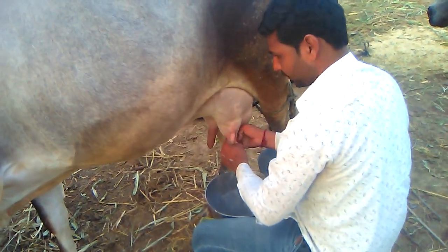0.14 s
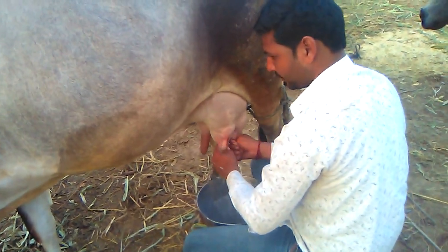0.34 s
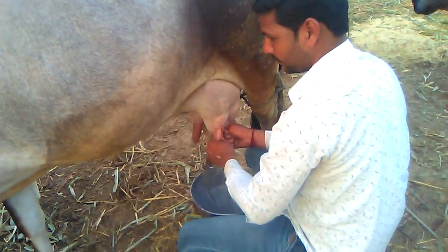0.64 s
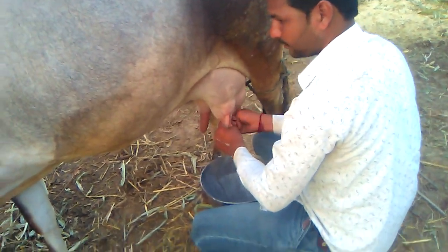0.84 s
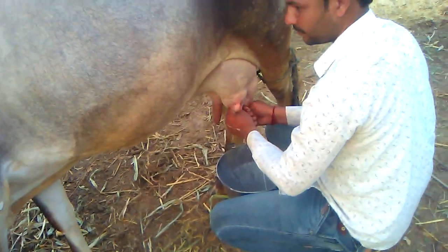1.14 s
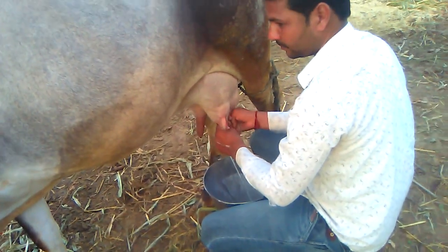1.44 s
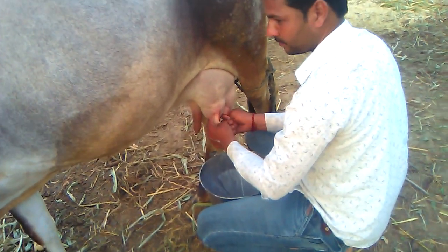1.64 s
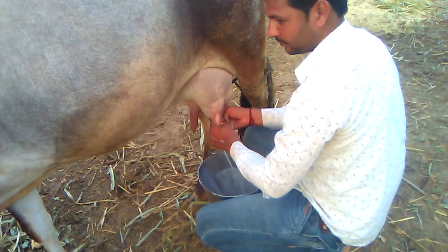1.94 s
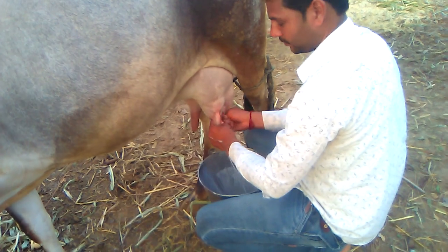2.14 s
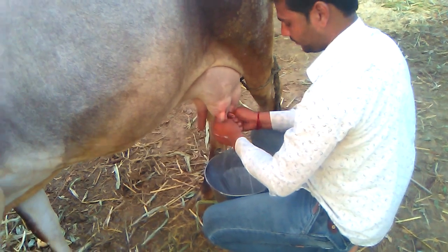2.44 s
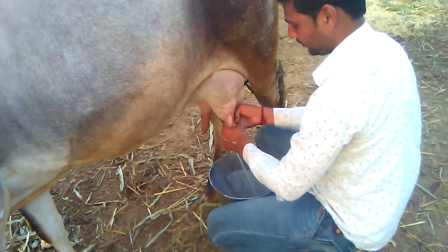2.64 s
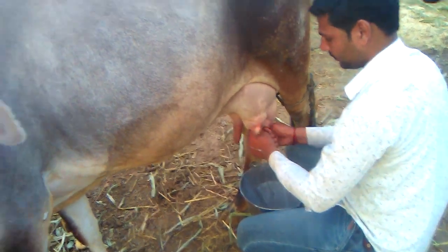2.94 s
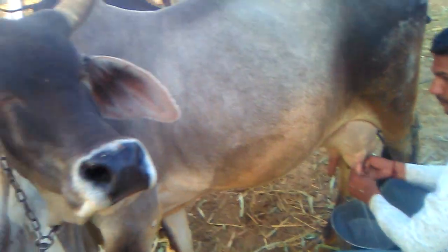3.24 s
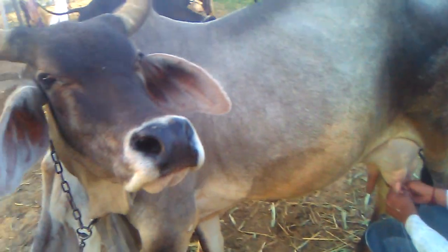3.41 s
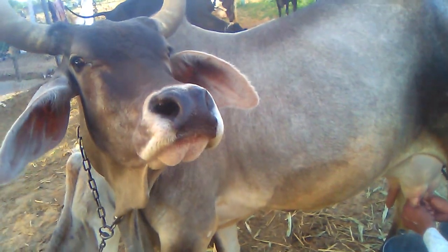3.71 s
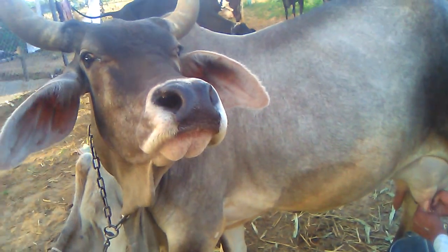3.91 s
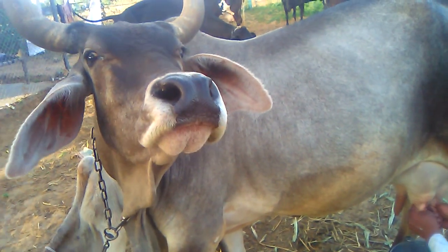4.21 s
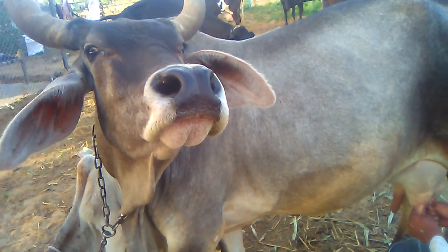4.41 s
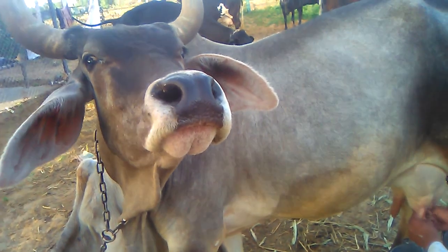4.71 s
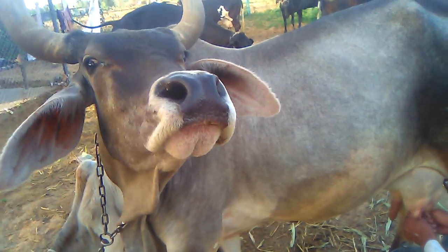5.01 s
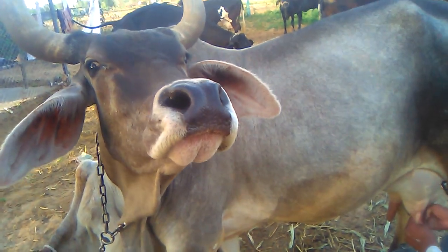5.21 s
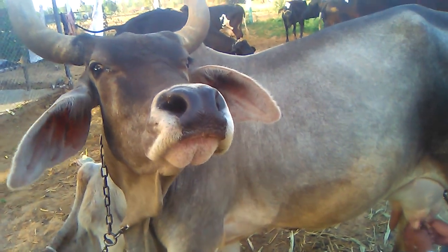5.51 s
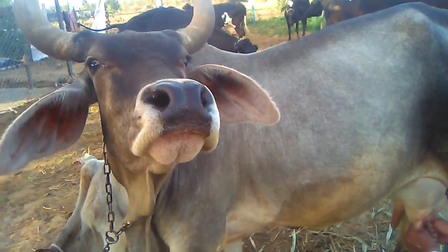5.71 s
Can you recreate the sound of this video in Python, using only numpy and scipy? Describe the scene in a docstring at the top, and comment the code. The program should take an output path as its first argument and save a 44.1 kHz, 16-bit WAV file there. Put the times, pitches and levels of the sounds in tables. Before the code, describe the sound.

A cow is milked by hand outdoors. About three short squirts a second land in a frothy steel pail, some fizzy and skimming, some plunging with a hollow gurgle. Dull taps and scuffs come early; straw rustles with each pull over a faint throbbing engine. Bird slurs and falling whistles come later, fingers rub the camera, then a sharp knock and a weak last jet. Close handheld camera microphone.

```python
"""A cow is milked by hand in an open yard: two hands in turn shoot jets into the froth in a steel pail.
From the start each jet whips up a swarm of small bubbles, deeper ones as it digs in, and fine spray.
Straw rustles and a far engine throbs throughout; early on there are dull taps and low noisy scuffs.
A bird gives a few short slurs, then, in the last third, three falling whistles; fingers rub the camera.
Near the end something knocks sharply against the camera, and one last weak jet follows."""
import sys
import numpy as np
from scipy import signal
from scipy.fft import rfft, irfft, next_fast_len
from scipy.io import wavfile
from scipy.ndimage import uniform_filter1d, map_coordinates

SR = 44100
rng = np.random.default_rng(int(sys.argv[2]) if len(sys.argv) > 2 else 0)


def wav_out(sig):
    """Save sig, one row per channel (or a flat mono array), as 16-bit PCM at SR to the path in sys.argv[1]."""
    wavfile.write(sys.argv[1], SR, np.round(np.clip(np.atleast_2d(sig).T, -1, 1) * 32767).astype(np.int16))


N = 258426  # length in samples

# Far engine. Each row: time in seconds, firing rate in Hz, level in dB before a small overall cut.
ENGINE_COURSE = [(0.0, 67.7, -73), (0.19, 65.4, -56), (2.2, 73.3, -44.5), (2.39, 66.4, -72),
                 (2.6, 72.7, -43.5), (4.4, 77.7, -48.5), (4.7, 74.4, -42.5), (4.8, 65.1, -50),
                 (4.96, 64.7, -46), (5.1, 75.8, -47.5), (5.44, 75.3, -48), (5.6, 63.5, -58)]
# Low rumble of the yard. Each row: frequency in Hz, relative level in dB.
RUMBLE_COLOUR = [(20, -38), (36, -3), (46, -33), (62, 12), (85, -3.5), (108, -1.5), (130, -9.5), (200, -21),
                 (400, -22.5), (800, -63)]
# Faint air of the yard. Each row: frequency in Hz, relative level in dB.
AIR_COLOUR = [(100, 6), (300, -1.5), (700, 5.5), (1600, 8), (2600, 0.5), (4500, -1.5), (14000, -49)]
THROB_HZ, THROB_DEPTH = 9.3, 0.54  # the engine's slow beat: mean rate, depth as a share

# The bird's falling whistle. Each row: seconds from its start, pitch in Hz, level in dB re the whistle.
WHISTLE_SHAPE = [(-.015, 7390, -28), (0, 6950, -9), (.04, 6160, 5), (.08, 5090, -1), (.12, 4200, -1.5),
                 (.16, 3330, -3), (.2, 2880, -2), (0.241, 2810, -5), (.265, 2830, -20)]
# When it whistles. Each row: start in seconds, level in dB.
WHISTLE_STARTS = [(4.1, -50.5), (4.802, -49.5), (5.304, -53)]
# Short slurs of the bird. Each row: start in seconds, length in seconds, start Hz, end Hz, level in dB.
BIRD_SLURS = [(0.128, 0.075, 4500, 6220, -57), (3.226, .045, 4520, 3000, -52.5),
              (3.356, 0.016, 3660, 5800, -51.5), (3.527, 0.083, 4640, 2410, -46.5),
              (3.666, 0.019, 3570, 5900, -54.5)]
# Faint wavering tones. Each row: start in seconds, length in seconds, mean pitch in Hz, level in dB.
FAINT_TONES = [(1.333, 1.74, 192, -62.5), (3.197, 0.23, 1570, -58)]

# Straw rustle between and beneath the pulls, rising and falling. Each row: time in seconds, level in dB.
RUSTLE_LEVEL = [(0, -60), (.9, -61), (1.8, -58), (2.7, -60.5), (3.12, -61), (3.4, -71), (3.62, -60),
                (4.03, -65.5), (4.35, -57.5), (4.7, -70), (4.95, -58), (5.86, -65.5)]
# Extra top treble of the rustle. Each row: time in seconds, level in dB re the crackle.
RUSTLE_TOP_LEVEL = [(0, -18), (3.2, -17), (4.1, -8), (5.86, -10)]
# Colour of the straw crackle. Each row: frequency in Hz, relative level in dB.
STRAW_COLOUR = [(2800, -68), (4400, -8.5), (4960, -4.5), (6100, 4.5), (7000, 1.5), (8200, 3), (9700, 1.5),
                (11100, -2), (14300, -7)]
# Colour of that top treble. Each row: frequency in Hz, relative level in dB.
RUSTLE_TOP_COLOUR = [(8000, -43), (12000, 17), (14500, 9), (16000, -30)]
# Straw snaps and stray drops. Each row: time in seconds, strength in dB before a fixed cut.
STRAW_SNAPS = [(0.2608, -62), (0.792, -32.5), (1.781, -36), (1.8266, -33.5), (2.453, -39), (2.6258, -36),
               (2.685, -42), (3.4261, -39), (4.8788, -34.5), (4.9496, -35), (4.9683, -33.5), (5.235, -36.5),
               (5.6625, -44)]
# The arm stirs before a skimming jet lands; at full depth it stirs later by the lag.
RUSTLE_LEAD_S, RUSTLE_LAG_S = 0.042, 0.082
RUSTLE_ATTACK_S, RUSTLE_RELEASE_S = 0.019, 0.059

# Dull taps. Each row: time in seconds, level of the tone at its start in dB, pitch in Hz.
DULL_TAPS = [(0.045, -34, 534), (.070, -40.5, 445), (.098, -45, 476), (.186, -34.5, 493), (0.234, -37, 423),
             (0.255, -39, 453), (.271, -29, 540), (.545, -33, 490), (0.567, -32.5, 443), (.578, -34, 425),
             (0.59, -36.5, 416), (0.627, -41, 500), (3.045, -41, 454), (5.767, -35.5, 337)]
# Low noisy scuffs and, last, one short gurgle of milk.
# Each row: start in seconds, length in seconds, level in dB.
LOW_SCUFFS = [(0, .14, -59), (.22, 0.19, -50), (.38, 0.31, -57), (.6, 0.15, -45.5), (.75, 0.49, -57.5),
              (3.05, .1, -50.5)]
# Fingers shifting on the camera. Each row: start in seconds, length in seconds, level in dB.
FINGER_RUBS = [(4.33, 0.1, -43), (4.4, 0.2, -47), (4.585, 0.093, -43), (5.5, 0.35, -54.5)]
# Colours of the low scuffs and of the fingers. Each row: frequency in Hz, relative level in dB.
SCUFF_COLOUR = [(120, -33), (270, -11.5), (480, -11), (700, -6.0), (1300, -38)]
FINGER_COLOUR = [(20, -21), (45, 5.0), (80, -1.5), (130, -5.5), (270, -6.0), (380, -17.0), (900, -37.5)]

# The knock rocks the camera to and fro. Each row: time in seconds, strength in dB,
# contact time in seconds (divided by the hardness later), release time in seconds.
KNOCK_PUSHES = [(5.6797, -1, 0.000097, 0.0013), (5.6839, -3.5, 0.00022, 0.0023),
                (5.6886, 0.5, .0011, 0.0015)]
# The camera's low cut. Each row: frequency in Hz, width in Hz.
LOW_CUTS = [(43, 16), (63, 23)]
PORT_HZ, PORT_WIDTH_HZ = 3920, 260  # the microphone port rings briefly here
TOP_HZ = 14500  # upper band limit of the camera

# Single large bubbles as a jet strikes or surges.
# Each row: time in seconds, level in dB before a soft onset, pitch in Hz.
LARGE_BUBBLES = [(.274, -33, 2270), (.907, -24, 2030), (.923, -20, 1910), (1.533, -24.5, 1690),
                 (2.161, -22.5, 2165), (2.207, -16, 2000), (3.444, -26, 2140), (3.765, -36.5, 2197),
                 (4.444, -21, 2214), (5.389, -34, 2250)]
# Air and wall resonances of the pail. Each row: frequency in Hz, width in Hz, gain in dB.
PAIL_MODES = [(553, 90, -7), (680, 15, 3), (770, 55, -7), (970, 26, 4), (1208, 73, 5), (1560, 460, -9),
              (1720, 110, -14), (1940, 140, -26), (2073, 122, -5), (2330, 130, -12), (2510, 160, -13),
              (3350, 150, -8), (3650, 270, 2.5)]
# Colours given to the small bubbles, the deep bubbles and the spray.
# Each row: frequency in Hz, relative gain in dB.
FROTH_COLOUR = [(450, -55), (800, -22.5), (1050, 1.5), (1400, -4.5), (1800, 0), (2300, 3.5), (2600, 3),
                (3100, -13), (4200, -47)]
PLUNGE_COLOUR = [(200, -36), (400, -15), (520, 0.5), (640, -0.5), (760, 0), (900, 0), (1100, -5),
                 (1600, -50)]
SPRAY_COLOUR = [(1900, -51), (2550, 0.5), (3100, -1.5), (3650, -7.5), (4000, 2), (4350, -2), (6000, -19)]
# The squirts; some jets dig deep, others skim the froth. Each row: start in seconds, length in seconds,
# swell time in seconds, froth level in dB, fade over the stroke in dB, basic bubble pitch in Hz,
# fall of pitch over the stroke (natural log), deepest moment in seconds after the start,
# depth (0 skims, 1 plunges), closing surge in dB, spray level in dB re the jet's flow,
# moment of most spray in seconds after the start, rustle level in dB.
JETS = [(0.002, 0.1, 0.066, -32.5, 14, 2300.0, -0.079, 0.068, 0.12, 0.5, 1.4, 0.13, -57.5),
        (0.27, 0.276, 0.066, -29.5, 13, 1924, 0.058, 0.141, 0.19, 6.5, -3, 0.191, -61.0),
        (0.6, 0.21, 0.12, -32, 5, 1750, 0.083, 0.15, 0.15, 2, -6.1, 0.0066, -56),
        (0.9, 0.23, 0.032, -35.5, -4.5, 1683, 0.26, 0.15, 0.73, -1, -9, 0.07, -77),
        (1.24, 0.2, 0.05, -35.5, 1.7, 1725, 0.038, 0.067, 0.0, -0.8, -4.5, 0.025, -54.5),
        (1.546, 0.24, 0.025, -35, -4.5, 1826, 0.18, 0.21, 0.69, -3.5, -10, 0.14, -59),
        (1.859, 0.2, 0.061, -30, 5.5, 1320, -0.11, 0.15, 0.1, 1, -10.5, 0.057, -58.5),
        (2.157, 0.26, 0.094, -30.5, 8, 1760.0, 0.15, 0.16, 0.74, 6, -15.5, 0.25, -68),
        (2.488, 0.19, 0.063, -36, 6, 1834, -0.065, 0.14, 0.032, 3.4, -1.7, 0.045, -54.0),
        (2.793, 0.26, 0.084, -26.5, 17.5, 1745, 0.3, 0.14, 0.7, 3.3, -10.5, 0.01, -62),
        (3.439, 0.13, 0.047, -34.5, 3, 2053, 0.42, 0.073, 0.7, 1.2, -9.5, 0.16, -56),
        (3.762, 0.18, 0.033, -36, 17.5, 1879, -0.059, 0.126, 0.025, 8.5, -5.5, 0.075, -60),
        (4.066, 0.21, 0.011, -39, -8.0, 1690, -0.13, 0.16, 0.61, 3, -14.5, 0.17, -58),
        (4.423, 0.16, 0.025, -33.5, 11, 1830.0, -0.13, 0.14, 0.35, 13, -9.5, 0.15, -56.5),
        (4.724, 0.25, 0.094, -29.5, 9, 1790, 0.17, 0.12, 0.56, 3, -13, 0.253, -65.5),
        (5.104, 0.18, 0.011, -35.1, 8.5, 1752, 0.25, 0.15, 0.36, 4.5, -16.5, 0.01, -63),
        (5.387, 0.23, 0.27, -30.5, 7.5, 1770.0, 0.33, 0.12, 0.47, -2, -11.5, 0.069, -62.5),
        (5.767, 0.085, 0.038, -43.5, 6, 1890.0, -0.33, 0.01, 0.48, 4.5, -4.9, 0.023, -58.5)]
FRONT_S, FRONT_DB = .014, -11.5  # the jet strikes at part of its strength, then swells
RELEASE_S, DRIBBLE_DB, DRIBBLE_S = 0.039, -20, 0.1  # the jet stops, and a thin dribble trails it
# At full depth: spread in time, hush of the froth, fall of pitch (natural log).
DIG_S, DIG_MUFFLE_DB, PITCH_DIP = 0.039, 8.5, 0.25
SURGE_AFTER_S, SURGE_S = 0.082, 0.017  # the fist closes after the deepest moment: delay and spread
# Gurgle re the flow when skimming; its rise at full depth; its spread in time.
GURGLE_DB, GURGLE_RISE_DB, GURGLE_S = -17, 17.5, 0.067
SPRAY_S, SPRAY_BURST_DB = 0.013, 6.5  # burst of spray: spread in time, height over the rest of the stroke
SPREAD_S = 0.024  # spray and gurgle need this long to build
FRINGE_DB, FRINGE_RISE_DB = 0, 0.5  # gain of bubbles of many sizes; its rise at full depth
BEADS_DB, PAIL_RING_S = .8, .45  # unevenness of the jet; time for the pail's ring to fall 60 dB


def amp(db):
    """Decibels to gain."""
    return 10 ** (np.asarray(db) / 20)


def unit(x):
    """Scale to rms 1."""
    return x / np.sqrt(np.mean(x ** 2) + 1e-20)


def clock():
    """The time of every sample in seconds."""
    return np.arange(N) / SR


def curves(rows):
    """One value per sample for each column after the time."""
    s, *cols = np.transpose(rows)
    return [np.interp(clock(), s, c) for c in cols]


def wobble(rate):
    """A smooth random curve through so many random points a second."""
    knots = rng.standard_normal(int(N * rate / SR) + 4)
    return map_coordinates(knots, [clock() * rate])


def filtered(x, response):
    """Multiply the spectrum of x by a response of frequency."""
    m = next_fast_len(N + SR // 2)
    return irfft(rfft(x, m) * response(np.fft.rfftfreq(m, 1 / SR)), m)[..., :N]


def coloured(x, points):
    """Shape x by points of Hz and dB, at rms 1."""
    f, db = np.transpose(points)
    return unit(filtered(x, lambda hz: amp(np.interp(np.log(hz + 1), np.log(f), db))))


def levelled(x, span):
    """Hold the level of x near 1 over spans of so many seconds."""
    power = np.abs(uniform_filter1d(x * x, max(int(span * SR), 8)))
    return x / np.sqrt(power + 1e-6)


def gate(age, length, attack, release):
    """A straight rise, a hold until length, an exponential release."""
    return np.clip(age / attack, 0, 1) * np.exp(-np.maximum(age - length, 0) / release)


def swells(rows):
    """Summed gain of strokes that each swell and fade."""
    t = clock()
    total = 0
    for s, length, db in rows:
        done = np.clip((t - s) / length, 0, 1)
        total = total + amp(db) * np.sqrt(np.abs(np.sin(np.pi * done)))
    return total


def scattered(x, t60, wet_db):
    """Add a dense cluster of fading reflections, new at every call."""
    t = np.arange(SR // 4) / SR
    tail = rng.standard_normal(len(t)) * amp(-60 * t / t60)
    echo = signal.fftconvolve(x, tail / np.linalg.norm(tail))[:len(x)]
    return (x + amp(wet_db) * echo) / np.hypot(1, amp(wet_db))


def patchy(x, depth_db):
    """Give x short random patches of gain in time and frequency."""
    z = signal.stft(x, nperseg=512)[2]
    field = rng.standard_normal(z.shape[1:])
    for axis in (0, 1):
        field = uniform_filter1d(field, size=6, axis=axis)
    return signal.istft(z * amp(depth_db * unit(field)), nperseg=512)[1][:, :N]


def yard():
    """A far engine throbs over the low rumble and faint air of the yard."""
    firing_hz, engine_db = curves(ENGINE_COURSE)
    phase = 2 * np.pi * np.cumsum(firing_hz + 1.41 * wobble(14)) / SR
    beat_phase = 2 * np.pi * np.cumsum(THROB_HZ + 0.49 * wobble(2.58)) / SR
    throb = 1 + THROB_DEPTH * np.sin(beat_phase)
    tones = np.sin(phase) + 0.29 * np.sin(phase / 2) + 0.12 * np.sin(3 * phase / 2)
    engine = amp(engine_db - 2.5) * unit(throb * amp(0.47 * wobble(8)) * tones)
    rumble = amp(-51.0) * coloured(rng.standard_normal(N), RUMBLE_COLOUR)
    air = amp(-61) * coloured(rng.standard_normal(N), AIR_COLOUR)
    return engine + rumble + air


def ring():
    """Faint, slightly wavering tones that swell and fade."""
    out = np.zeros(N)
    for s, length, hz, db in FAINT_TONES:
        swell = np.sin(np.pi * np.clip((clock() - s) / length, 0, 1))
        tone = np.sin(2 * np.pi * np.cumsum(hz + 17 * wobble(60)) / SR)
        out += amp(db + 4.5 * wobble(29.54)) * swell * tone
    return out


def bird():
    """A thin, slightly unsteady tone glides through short slurs and three long falling whistles."""
    t, out = clock(), np.zeros(N)

    def tone(hz):
        """A sine whose pitch trembles a little."""
        return np.sin(2 * np.pi * np.cumsum(hz * (1 + 0.00658 * wobble(300))) / SR)

    for s, db in WHISTLE_STARTS:
        hz, shape_db = curves([(s + at, f, level) for at, f, level in WHISTLE_SHAPE])
        sounding = (t > s + WHISTLE_SHAPE[0][0]) * (t < s + WHISTLE_SHAPE[-1][0])
        out += amp(db + shape_db + 3.1 * wobble(70)) * tone(hz) * sounding
    for s, length, start_hz, end_hz, db in BIRD_SLURS:
        done = np.clip((t - s) / length, 0, 1)
        out += amp(db) * np.sin(np.pi * done) * tone(start_hz + (end_hz - start_hz) * done)
    return out


def straw():
    """A fine crackling rustle in stereo that swells with every pull, and a few sharper snaps."""
    t = clock()
    pulls = np.zeros(N)
    for start, length, *_, depth, _, _, _, db in JETS:
        age = t - start + RUSTLE_LEAD_S - RUSTLE_LAG_S * depth
        pulls += amp(db) * gate(age, length, RUSTLE_ATTACK_S, RUSTLE_RELEASE_S)
    flicker = unit(amp(1.6 * wobble(14) + 2.0 * wobble(45) + 1.7 * wobble(700)))
    level = np.hypot(amp(curves(RUSTLE_LEVEL)[0]), pulls) * flicker
    for s, db in STRAW_SNAPS:
        level = level + amp(db - 9.0 - 60 * np.abs(t - s - .001) / 0.0089)
    crackle = coloured(patchy(rng.standard_normal((2, N)), depth_db=3.5), STRAW_COLOUR)
    top = coloured(rng.standard_normal((2, N)), RUSTLE_TOP_COLOUR)
    mid, side = crackle + amp(curves(RUSTLE_TOP_LEVEL)[0]) * top
    # the rustle is wider in the treble
    side = filtered(side, lambda hz: amp(np.interp(hz, [4000, 7000], [-18, -6])))
    return level * np.array([mid + side, mid - side])


def taps():
    """Dull damped taps, low noisy scuffs with one short gurgle, and fingers shifting on the camera."""
    out, t = np.zeros(N + SR), np.arange(SR // 16) / SR
    b, a = signal.butter(2, [250, 900], 'band', fs=SR)
    for s, db, hz in DULL_TAPS:
        grit = unit(signal.lfilter(b, a, rng.standard_normal(len(t))))
        tap = amp(db - 60 * t / 0.032) * (np.sin(2 * np.pi * hz * t) + 0.2 * grit)
        out[round(s * SR):][:len(t)] += tap
    scuffs = coloured(rng.standard_normal(N) * amp(4.6 * wobble(120)), SCUFF_COLOUR)
    fingers = coloured(rng.standard_normal(N) * amp(1.7 * wobble(50)), FINGER_COLOUR)
    # a faint floor of the same low noise lies under the scuffs
    return out[:N] + (amp(-64.5) + swells(LOW_SCUFFS)) * scuffs + swells(FINGER_RUBS) * fingers


def shoves(hardness):
    """Pressure of quick pushes in alternate directions; harder contact rises faster."""
    push = np.zeros(N)
    for k, (s, db, contact, release) in enumerate(KNOCK_PUSHES):
        t = np.maximum(clock() - s, 0)
        rise = 1 - np.exp(-(hardness * t / contact) ** 2)
        push -= (-1) ** k * amp(db) * rise * np.exp(-t / release)
    return push


def knock():
    """A thud with a thin bright edge; the low cut removes steady push and rings briefly."""
    treble = signal.butter(N=6, Wn=8000, btype='high', fs=SR, output='sos')
    push = shoves(hardness=0.98) + amp(-11.5) * signal.sosfilt(treble, shoves(hardness=3.9))

    def camera(f):
        """The port only delays sound near its pitch; the low cut rings low down."""
        port = np.exp(-2j * np.arctan2(f * PORT_WIDTH_HZ, PORT_HZ ** 2 - f * f))
        cuts = [f * f / (f * f - c * c - 1j * f * w) for c, w in LOW_CUTS]
        return port * np.prod(cuts, axis=0)

    return filtered(push, camera)


def plops():
    """A large bubble rings briefly between the walls of the pail."""
    out, t = np.zeros(N + SR), np.arange(SR // 10) / SR
    for s, db, hz in LARGE_BUBBLES:
        onset = 1 - np.exp(-t / 0.0022)
        bubble = amp(db - 60 * t / 0.029) * onset * np.sin(2 * np.pi * hz * t)
        out[round(s * SR):][:len(t)] += scattered(bubble, t60=.04, wet_db=-2)
    return out[:N]


def bubbles(pitch_hz, spread, cycles, size_db, count, size=640):
    """A swarm of damped rings scattered round a pitch; each rises a little as it nears the surface."""
    start = rng.integers(0, N, count)
    hz = (pitch_hz * np.ones(N))[start] * np.exp(spread * rng.standard_normal(count))
    turns = hz[:, None] * np.arange(size) / SR
    age = turns / cycles
    envelope = np.exp(-3 * age) * (1 - np.exp(-2 * turns))
    rings = envelope * np.sin(2 * np.pi * turns * (1 + 0.031 * age))
    rings *= amp(size_db * np.minimum(rng.standard_normal(count), 2))[:, None]
    places = start[:, None] + np.arange(size)
    return np.bincount(places.ravel(), rings.ravel(), N + size)[:N]


def pail(x, direct_db):
    """Sound leaves the pail partly straight, partly through its resonances."""
    def response(f):
        """The straight path plus every resonance."""
        modes = sum(amp(db) * 1j * f * w / (c * c - f * f + 1j * f * w) for c, w, db in PAIL_MODES)
        return amp(direct_db) + modes

    return filtered(x, response)


def squeezes():
    """For each squirt: its samples, bubble pitch, depth, and the gains of froth, gurgle and spray."""
    for (start, length, swell, db, fade_db, hz, sag, deepest, depth,
         surge_db, spray_db, spray_at, _) in JETS:
        first = max(int((start - FRONT_S / 2) * SR), 0)
        near = np.arange(first, min(int((start + length) * SR) + SR // 4, N))
        age = near / SR - start
        done = np.clip(age / length, 0, 1)

        def bump(at, width):
            """A smooth hump of height 1."""
            return np.exp(-.5 * ((age - at) / width) ** 2)

        def stream(release):
            """The jet switched on and off."""
            return gate(age + FRONT_S / 2, length + FRONT_S / 2, FRONT_S, release)

        flow = np.maximum(stream(RELEASE_S), amp(DRIBBLE_DB) * stream(DRIBBLE_S))
        flow *= np.interp(age, [0, swell], [amp(FRONT_DB), 1]) * amp(db - fade_db * done)
        dig = depth * bump(deepest, DIG_S)
        surge = amp(surge_db * bump(deepest + SURGE_AFTER_S, SURGE_S))
        froth = flow * surge * amp(-DIG_MUFFLE_DB * dig)
        spread = np.clip(age / SPREAD_S, 0, 1)
        gurgle = flow * spread * amp(GURGLE_DB + GURGLE_RISE_DB * depth * bump(deepest, GURGLE_S))
        burst_db = spray_db - SPRAY_BURST_DB * (1 - bump(spray_at, SPRAY_S))
        spray = flow * spread * surge * amp(burst_db)
        pitch_hz = hz * np.exp(-sag * (done - .5) - PITCH_DIP * dig)
        yield near, pitch_hz, dig, (froth, gurgle, spray)


def milk():
    """Each jet fizzes in the froth, gurgles where it plunges deep, and throws fine spray."""
    jets, pitch_hz, depth = list(squeezes()), np.full(N, 1800.), np.zeros(N)
    for near, hz, dig, _ in jets:
        pitch_hz[near], depth[near] = hz, dig
    core_hz = pitch_hz * np.exp(.055 * wobble(25))
    core = unit(bubbles(core_hz, spread=0.058, cycles=16, size_db=3.0, count=2000, size=1000))
    fringe_hz = np.sqrt(pitch_hz * 1650)
    fringe = unit(bubbles(fringe_hz, spread=0.2817, cycles=23.0, size_db=3.0, count=2800, size=900))
    fringe *= amp(FRINGE_DB + FRINGE_RISE_DB * depth)  # a deep jet stirs up bubbles of many sizes
    deep = bubbles(768, spread=0.186, cycles=18.3, size_db=1.5, count=1500, size=1200)
    fine_hz = 2880 * np.exp(.04 * wobble(15))
    fine = bubbles(fine_hz, spread=0.12, cycles=35, size_db=1.5, count=4500, size=500)
    layers = [(core + fringe, FROTH_COLOUR), (deep, PLUNGE_COLOUR), (fine, SPRAY_COLOUR)]
    swarms = [coloured(pail(swarm, direct_db=-2), colour) for swarm, colour in layers]
    beads = amp(BEADS_DB * wobble(45))  # the jet breaks into beads
    wavers = amp([1.4 * wobble(21.93), 0.94 * wobble(25.1), 1.4 * wobble(24.66)])  # and its aim wanders
    out = np.zeros(N)
    for near, *_, gains in jets:
        for swarm, gain, waver in zip(swarms, gains, wavers):
            # every jet lands on a new spot, so the walls colour it anew
            landed = scattered(swarm[near], t60=0.036, wet_db=0.5)
            out[near] += gain * waver[near] * levelled(landed, span=0.017)
    return scattered(beads * out, t60=PAIL_RING_S, wet_db=-13)  # the pail rings on between squirts


def scene():
    """All but the rustle sits in the middle; the bird's notes scatter round the yard."""
    surroundings = yard() + ring() + scattered(bird(), t60=0.17, wet_db=-3)
    return surroundings + straw() + taps() + knock() + plops() + milk()


def record(dry):
    """The camera keeps next to nothing above its band limit."""
    return filtered(dry, lambda hz: 1 / np.sqrt(1 + (hz / TOP_HZ) ** 600))


dry = scene()
out = record(dry)
wav_out(out)
```